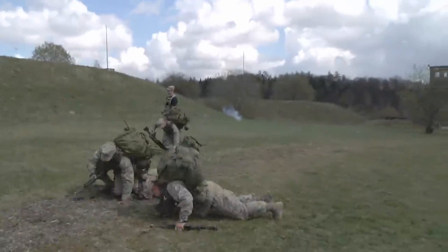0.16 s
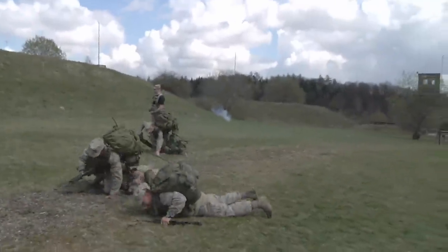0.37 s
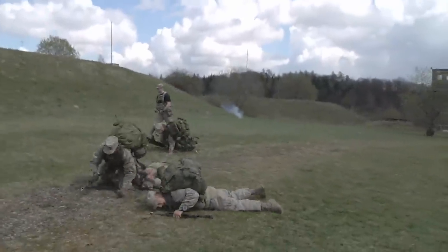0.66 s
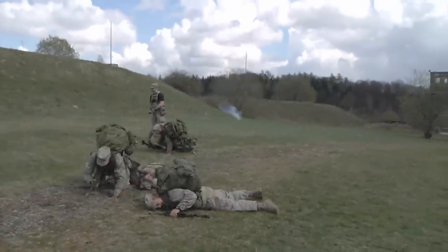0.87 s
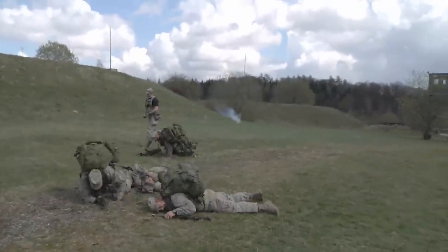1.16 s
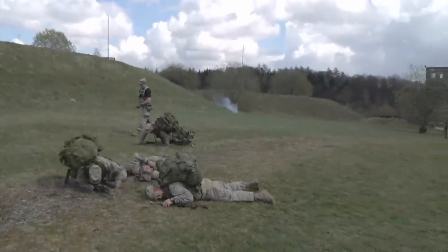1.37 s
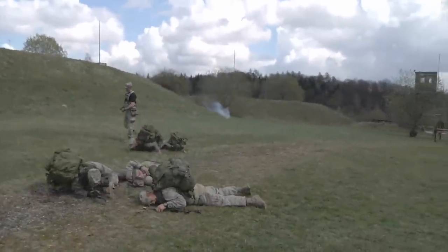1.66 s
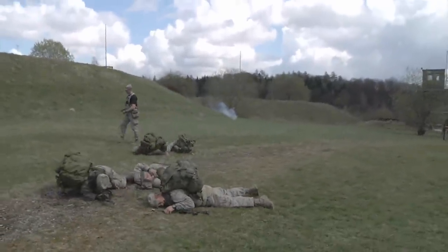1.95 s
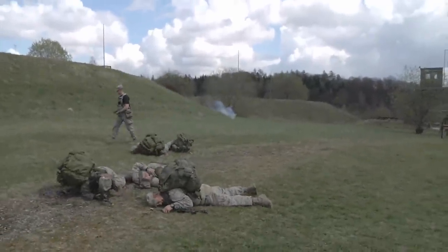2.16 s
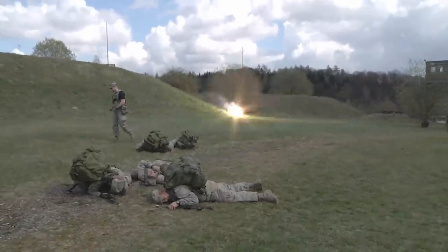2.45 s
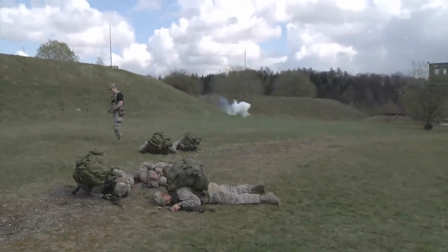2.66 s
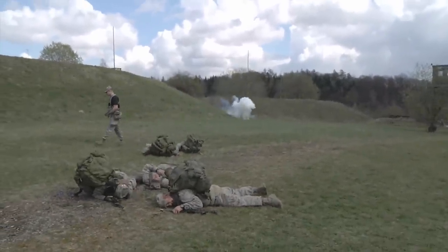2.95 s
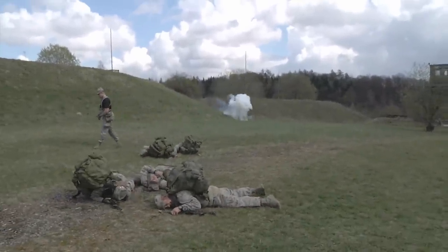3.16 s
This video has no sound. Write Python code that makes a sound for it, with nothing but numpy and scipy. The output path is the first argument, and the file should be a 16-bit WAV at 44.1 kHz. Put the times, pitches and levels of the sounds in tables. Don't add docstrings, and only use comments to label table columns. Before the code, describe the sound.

Loud explosive bang outdoors, preceded by a thin falling whistle and gear rustle, with rumbling echoes

```python
import sys
import numpy as np
from scipy import signal
from scipy.io import wavfile

SR = 44100
rng = np.random.default_rng(int(sys.argv[2]) if len(sys.argv) > 2 else 0)


def int16_out(signal):
    q = np.round(np.clip(np.atleast_2d(signal).T, -1, 1) * 32767)
    wavfile.write(sys.argv[1], SR, q.astype(np.int16))


def decibels_to_gain(level_db):
    exponent = np.asarray(level_db, float) / 20
    return 10 ** exponent


N = 145530
T = np.arange(N) / SR
BURST_S = 2.6171

# (frequency [Hz], likeness [1 = same in both])
ECHO_LIKENESS = [(60, 0.97), (180, 1.0), (550, 1), (1650, 0.86), (4970, 0.36), (15000, -1)]


def rms_one(x):
    return x / np.sqrt(np.mean(x ** 2) + 1e-20)


def at_hz(points, hz):
    table_hz, values = np.transpose(points)
    return np.interp(np.log(hz), np.log(table_hz), values)


def lean(db):
    return decibels_to_gain([[db / 2], [-db / 2]])


def drift(rate):
    r = np.exp(-2 * np.pi * rate / SR)
    settled = signal.lfilter([1], [1, -2 * r, r * r], rng.standard_normal(N + SR))[SR:]
    return rms_one(settled)


def cut(x, hz, kind):
    return signal.sosfilt(signal.butter(2, hz, kind, fs=SR, output="sos"), x)


def swells(rows):
    total = 0
    for s, db, rise, fall in rows:
        total = total + decibels_to_gain(db) * np.exp(np.where(T < s, (T - s) / rise, (s - T) / fall))
    return total


def banded(white, colour, likeness, patchy_db, air_db=0):
    out = 0
    edges = 22 * 2 ** np.arange(0, 9.6, .5)
    for k, (low, high) in enumerate(zip(edges, edges[1:])):
        hz = np.sqrt(low * high)
        if colour[0][0] / 1.4 < hz < colour[-1][0] * 1.4:
            band = signal.butter(2, [low, high], "band", fs=SR, output="sos")
            mid, side = signal.sosfilt(band, white[k % 2])
            alike = np.clip(at_hz(likeness, hz), 0, 1)
            gain = decibels_to_gain(at_hz(colour, hz) + patchy_db * drift(14.3)) * decibels_to_gain(-air_db * hz / 1000)
            out = out + gain * (np.sqrt(1 + alike) * mid + np.sqrt(1 - alike) * side * [[1], [-1]])
    return out


def noise():
    return rng.standard_normal((2, 2, N))


def grains(per_s, spread_db):
    hits = rng.random((2, N)) < per_s / SR
    size = decibels_to_gain(spread_db * np.minimum(rng.exponential(1, (2, N)), 5))
    return hits * size * rng.choice([-1, 1], (2, N))


def air():
    # (time [s], level [dB])
    gusts = [
        (0.0, -51),
        (0.56, -42),
        (0.94, -61.5),
        (1.25, -50.5),
        (1.33, -58.5),
        (1.93, -48.5),
        (2.31, -54),
        (2.59, -49),
    ]
    # (frequency [Hz], level [dB per Hz])
    stir_colour = [(13, -38), (22, -5), (87, -2), (219, -9.5), (545, -24), (600, -26), (780, -62),
                   (1320, -120)]
    # (frequency [Hz], level [dB per Hz])
    hush_colour = [(200, -11.5), (1600, -15.5), (2400, -21.5), (3700, -17.5), (4300, -24.5), (6800, -25),
                   (8000, -32), (15600, -30.5)]
    # (frequency [Hz], likeness [1 = same in both])
    near_likeness = [(60, 0.8), (180, 0.91), (550, 0.92), (1650, 0.91), (4970, 0.65), (15000, -1.65)]
    gust_s, gust_db = np.transpose(gusts)
    stir = decibels_to_gain(np.interp(T, gust_s, gust_db)) * rms_one(banded(noise(), stir_colour, near_likeness, 1.65))
    hush = decibels_to_gain(-59) * rms_one(banded(noise(), hush_colour, near_likeness, 1.0))
    return stir + hush


def gear():
    # (peak time [s], level [dB], rise [s], fall [s], centre [Hz])
    rubs = [(.008, -46, .01, 0.017, 2040), (.2, -60.5, 0.3, 0.13, 3530), (0.361, -50, 0.027, 0.051, 620),
            (.37, -61, 0.024, 0.11, 3500), (0.511, -46.5, 0.021, 0.034, 2500),
            (.64, -51.5, 0.05, 0.054, 2400), (.8, -56.5, .03, 0.054, 432), (1.198, -57, 0.004, 0.013, 9400),
            (1.203, -47.5, .008, 0.011, 4700), (1.452, -51, 0.094, 0.14, 2640),
            (1.45, -59, 0.44, 0.38, 558), (1.711, -67.5, 0.013, 0.014, 4770),
            (1.759, -53, 0.047, 0.02, 864), (2.5, -59.5, 0.05, .06, 2800)]
    # (time [s], peak level [dB], pitch [Hz], ring to -60 dB [ms])
    knocks = [(0.057, -29, 630, 16), (0.344, -41, 3410, 28), (.356, -28.5, 773, 24),
              (0.486, -23.5, 367, 21), (.503, -38.5, 3050, 20), (.52, -39, 834, 41), (0.587, -22, 49, 120),
              (0.973, -43.5, 3530, 33), (1.146, -30, 3400, 4), (1.172, -38, 3040, 10),
              (1.195, -27, 3420, 6.8), (1.197, -30, 1130, 10), (1.754, -20, 188, 14)]
    half_band = 2 ** (.9 / 2)
    mid, side = grains(6000, 1.26)
    cloth = mid + 0.12 * side * np.array([[1], [-1]])
    out = 0
    for *hump, hz in rubs:
        band = signal.butter(4, [hz / half_band, hz * half_band], "band", fs=SR, output="sos")
        out = out + swells([hump]) * rms_one(signal.sosfilt(band, cloth))
    for s, db, hz, ms in knocks:
        u = np.maximum(T - s, 0)
        ring = decibels_to_gain(db - 60000 * u / ms) * np.sin(2 * np.pi * hz * u)
        soft_start = np.tanh(u * hz / 2)
        rattle = 1 + .4 * (hz > 300) * cut(rng.standard_normal(N), 1500, "low") / .27
        out = out + ring * soft_start * rattle
    return out


def roll():
    # (frequency [Hz], level [dB per Hz])
    roll_colour = [(15, -40), (25, -18), (54, -7), (91, 0.5), (134, -1), (348, -31), (394, -52), (500, -55),
                   (650, -81), (1100, -120)]
    level_db, t60_s, rise_s = -16, 1.87, 0.025
    late = np.maximum(T - BURST_S - .015, 0)
    shape = (1 - np.exp(-late / rise_s)) * decibels_to_gain(level_db - 60 * late / t60_s)
    return shape * rms_one(banded(noise(), roll_colour, ECHO_LIKENESS, 3.15))


def thumps():
    # (time [s], peak level [dB], pitch [Hz])
    banks = [(2.672, -26, 120), (2.691, -14.5, 130), (2.717, -7, 151), (2.733, -2.5, 122),
             (2.809, -13, 122), (2.826, -29, 130), (2.838, -11.5, 148), (2.923, -18.5, 120.4),
             (2.942, -21.5, 118), (2.992, -20.5, 138.5), (3.077, -9.5, 128), (3.096, -14, 108),
             (3.281, -22, 141)]
    bell_cycles = 0.61
    out = 0
    for s, db, hz in banks:
        cycles = (T - s) * hz
        out = out + decibels_to_gain(db) * np.cos(2 * np.pi * cycles) * np.exp(-(cycles / bell_cycles) ** 2)
    return out


def scatter():
    # (peak time [s], level [dB], rise [s], fall [s])
    returns = [(2.648, -29.5, 0.005, 0.0071), (2.664, -23.5, 0.0018, 0.0034), (2.686, -12, 0.0084, 0.0046),
               (2.712, -17.5, 0.011, 0.0094), (2.733, -25, 0.02, 0.026), (2.765, -34.5, .01, 0.053),
               (2.795, -36.5, 0.0052, 0.022), (2.837, -21.5, 0.0093, 0.0098), (2.865, -40, 0.0085, 0.038),
               (2.9, -36, 0.0026, 0.0053), (2.913, -31.5, 0.012, 0.009), (2.955, -43.5, 0.026, 0.018),
               (3.02, -45.5, 0.034, 0.03), (3.119, -40, 0.0072, 0.019), (3.238, -41, .003, 0.0083),
               (3.275, -38.5, 0.013, 0.02)]
    # (frequency [Hz], level [dB per Hz])
    scatter_colour = [(250, 3), (700, -3), (2500, -4), (3800, -9.5), (4600, -15), (7500, -22.5),
                      (8800, -32), (13000, -36)]
    swarms = [grains(9000, 3.0) for _ in range(2)]
    late = np.maximum(T - BURST_S, 0)
    air_loss = 2.0 * late
    flat = rms_one(banded(swarms, scatter_colour, ECHO_LIKENESS, .8, air_db=air_loss))
    return cut(flat, 13000, "low") * swells(returns) * (late > .004) * lean(-2)


def shock(s, push_ms, damping):
    u = np.maximum(T - s, 0) * 1000 / push_ms
    return (T >= s) * (1 - u) * np.exp(-damping * u)


def slaps():
    # (time [s], peak level [dB], left over right [dB], low edge [Hz])
    faces = [(2.641, -9, -27, 2500), (2.663, -0.5, -3, 1560), (2.703, 5.5, -1, 290), (2.7233, 4, -8, 377),
             (2.741, 7.5, -1, 292), (2.788, -50, 2, 2000), (2.836, 2.5, -1.5, 523),
             (2.897, -3.5, -15.5, 2140), (2.908, -2.5, -0.5, 800), (2.94, -16, -14, 2470),
             (3.105, -18, -9, 1570), (3.233, -26, -6, 910), (3.281, -31, 2, 250), (3.298, -17, -0.5, 248)]
    push_ms, smear_ms = 0.14, 1.0
    rough = rng.standard_normal((len(faces), 2, 300)) * np.exp(-T[:300] * 1000 / smear_ms)
    rough[:, :, 0] = 4
    out = 0
    for face, (s, db, pan, low_hz) in zip(rough, faces):
        top_hz = 5470 * (low_hz / 1000) ** .45 * np.exp(-0.59 * (s - BURST_S))
        pulse = cut(shock(s, push_ms, 0.51), low_hz, "high")
        pulse = cut(cut(pulse, top_hz, "low"), top_hz, "low")
        smear = face[0] + 0.17 * face
        out = out + decibels_to_gain(db - 19.5) * lean(pan) * signal.fftconvolve([pulse], smear, axes=1)[:, :N]
    return out


def whistle():
    # (time [s], pitch [Hz], level [dB])
    burn = [
        (0.0, 2200, -50),
        (0.24, 2240, -46),
        (0.93, 2186, -57.5),
        (1.1, 2113, -51.5),
        (1.3, 2126, -52.5),
        (1.34, 2067, -54),
        (1.9, 1975, -53),
        (2.57, 1927, -49.5),
        (2.59, 1936, -62),
    ]
    wobble_hz, flutter_db, haze_db = 14.0, 2.5, -20.5
    s, hz, db = np.transpose(burn)
    db = np.interp(T, s, db)
    pitch = np.interp(T, s, hz) + wobble_hz * (drift(10) + .6 * drift(35))
    phase = 2 * np.pi * np.cumsum(pitch) / SR
    tone = decibels_to_gain(db) * np.sin(phase) * (decibels_to_gain(flutter_db * drift(46)) + decibels_to_gain(haze_db) * drift(180))
    steady = db.mean() + .4 * (db - db.mean())
    for harmonic, below_db in ((2, -7.0), (3, -13.0)):
        tone += decibels_to_gain(steady + below_db + 1.5 * drift(45)) * np.sin(harmonic * phase)
    tone *= np.sqrt(2) * (T < BURST_S)
    return np.array([tone, np.roll(tone, 3)]) * lean(1.6)


def burst():
    # (delay [ms], height [full scale], push [ms], damping [per push], top [Hz])
    arrivals = [
        (0.0, 34, .47, 1.45, 15000),
        (1.0, 4.0, 2.7, 1.0, 230),
        (6.3, -.38, 12, 1.5, 1500),
        (8.6, 1.45, 24, 5, 230),
    ]
    # (after [ms], for [ms])
    flips = [
        (.16, .05),
        (.07, .1),
    ]
    x = 0
    for delay_ms, height, push_ms, damping, top_hz in arrivals:
        wave = shock(BURST_S + delay_ms / 1000, push_ms, damping)
        x = x - height * signal.lfilter(*signal.butter(1, top_hz, fs=SR), wave)
    ms = (T - BURST_S - .00006) * 1000
    flip = np.array([np.where((ms > after) & (ms < after + span), -1, 1) for after, span in flips])
    grit = decibels_to_gain(-12.0) * cut(rng.standard_normal((2, N)), 4900, "low") * (ms > 0) * np.exp(-np.abs(ms) / 3.5)
    return np.array([np.roll(x, 3), np.roll(x, 2)]) * flip * lean(.8) + grit


def scene():
    near = (air() + gear()) * lean(2)
    echoes = roll() + thumps() + scatter() + slaps()
    return near + echoes + whistle() + burst()


def top_cut(x):
    return signal.sosfilt(signal.butter(12, 17040, fs=SR, output="sos"), x)


def record(dry):
    clipped = np.clip(dry, -.98, .98)
    low_pass = signal.cheby2(8, 50, 17500, fs=SR, output="sos")
    return top_cut(signal.sosfilt(low_pass, clipped))


dry = scene()
out = record(dry)
int16_out(out)
```